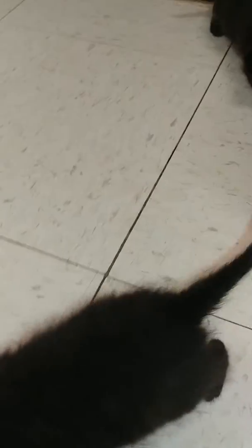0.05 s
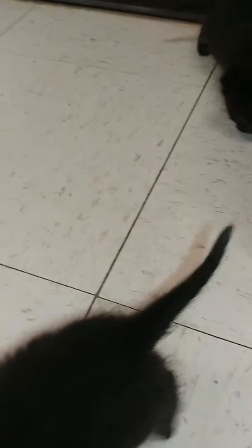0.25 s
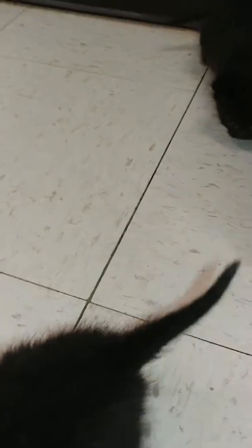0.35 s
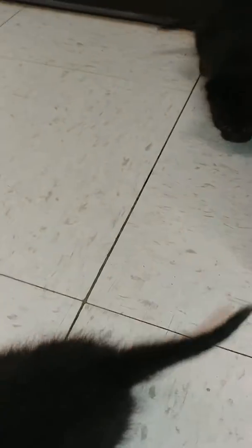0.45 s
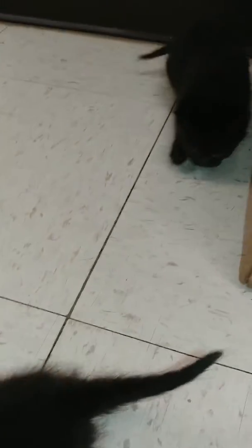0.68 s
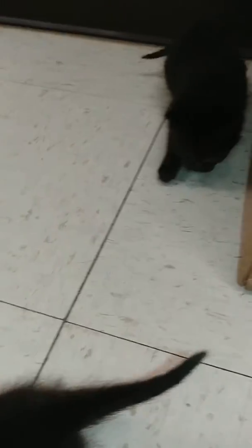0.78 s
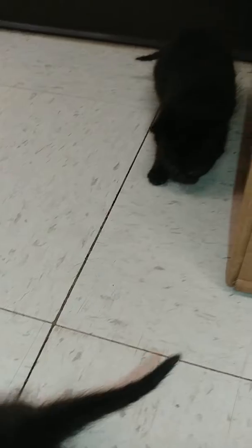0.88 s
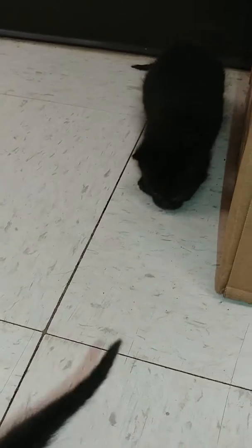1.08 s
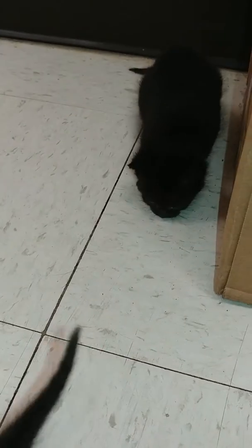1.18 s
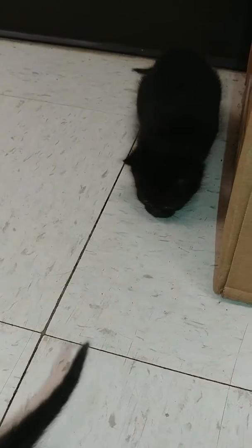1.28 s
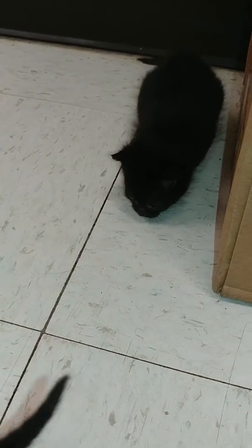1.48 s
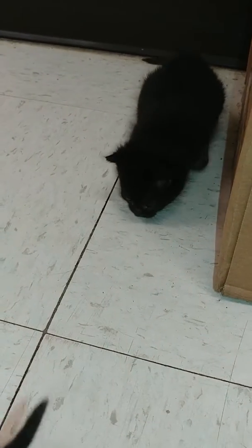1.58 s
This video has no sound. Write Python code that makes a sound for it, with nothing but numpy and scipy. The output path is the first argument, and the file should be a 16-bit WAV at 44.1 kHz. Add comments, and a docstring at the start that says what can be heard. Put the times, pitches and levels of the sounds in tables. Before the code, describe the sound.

Close to the microphone, lips make five crisp, wet kissing sounds in a fast, even run. Then come a small tick and a soft bump, over the faint steady hum of an appliance in a small, hard-floored room.

```python
"""Five quick, sharp lip smacks close to the microphone, probably kisses calling kittens in a small tiled room.
Each is a cluster of tiny wet snaps with the hollow pop of a small cavity opening.
The echo of a thin squeal dies away at the start; later come light ticks, a soft bump and tiny squeaks.
An appliance hums steadily underneath."""
import sys
import numpy as np
from scipy import signal
from scipy.fft import rfft, irfft, next_fast_len
from scipy.io import wavfile
from scipy.ndimage import map_coordinates

SR = 44100
rng = np.random.default_rng(int(sys.argv[2]) if len(sys.argv) > 2 else 0)


def output_pcm(signal):
    """Save a mono or channel-first signal as 16-bit PCM at the path in sys.argv[1].

    Samples are clipped to [-1, 1] before scaling.
    """
    pcm = np.clip(np.atleast_2d(signal).T, -1, 1) * 32767
    wavfile.write(sys.argv[1], SR, np.round(pcm).astype(np.int16))


N = 72765
SIDES = np.array([[.5], [-.5]])  # splits a left-minus-right value between the channels


def amp(db):
    return 10 ** (np.asarray(db) / 20)


def unit(x):
    """Scale to RMS 1."""
    return x / np.sqrt(np.mean(x ** 2) + 1e-20)


def along(points, hz):
    """Interpolate (Hz, value) points on a log axis."""
    freqs, values = np.transpose(points)
    return np.interp(np.log(hz + 1), np.log(freqs + 1), values)


def fade(t, t60):
    """Exponential decay, 60 dB in t60."""
    return np.exp(-np.log(1000) * t / t60)


def since(s):
    """Time since s, zero before it."""
    return np.maximum(np.arange(N) / SR - s, 0)


def wobble(rate):
    """Smooth random curve, rate knots a second."""
    return map_coordinates(rng.standard_normal(size=512), [np.arange(N) * rate / SR], mode="mirror")


def filtered(x, response):
    """Apply a complex frequency response."""
    size = next_fast_len(N + SR // 4)
    return irfft(rfft(x, size) * response(np.fft.rfftfreq(size, 1 / SR)), size)[..., :N]


def coloured(x, curve_db, size=2048):
    """Minimum-phase filter of unit energy."""
    cepstrum = irfft(np.log(amp(curve_db(np.fft.rfftfreq(size, 1 / SR))) + 1e-6))
    cepstrum[..., 1:size // 2] *= 2
    cepstrum[..., size // 2 + 1:] = 0
    impulse = np.atleast_2d(irfft(np.exp(rfft(cepstrum))))
    return signal.fftconvolve(np.atleast_2d(x), unit(impulse) / np.sqrt(size), axes=1)


def add(track, s, x):
    """Mix x into the track at time s."""
    start = round(s * SR)
    track[:, start:start + x.shape[-1]] += x[:, :N - start]


# Wet snaps (time [s], energy [dB], spray t60 [s], tilt [dB/octave], ring re snap [dB], ring [Hz])
SNAPS = [(0.2323, -25.5, 0.0049, 2, 1, 8600), (0.2364, -16.5, 0.0092, -3, -9, 5570),
         (0.2405, -12, 0.0013, 0.5, 0.5, 9000), (0.242, -9, 0.0085, 0.5, -3, 8980),
         (0.2435, -9.5, 0.0066, -0.5, -1, 5410), (0.3864, -20.5, 0.0064, -2.5, -14.5, 3240),
         (0.3906, -15.5, 0.0036, -3.5, -9.5, 8860), (0.3936, -11, 0.0011, -5.5, -18.5, 11500),
         (0.5232, -23.5, .003, 0, -17, 4500), (0.525, -5.5, 0.0074, 2, -7, 4490),
         (0.5261, -10.5, 0.012, 1.5, -6, 5600), (0.5254, -8.5, .003, 2.5, -9.5, 7440),
         (0.5285, -4.5, 0.016, -1.5, -14, 9070), (0.6486, -23, 0.0034, 0, -16.5, 6250),
         (0.6502, -21.5, 0.0067, -1, -15, 6307), (.6523, -5, 0.0068, -0.5, -2, 6370),
         (0.6527, -5, 0.0045, 0, 1.5, 5496), (0.6539, 0, 0.0015, 3, 2, 9196),
         (0.6568, -13, 0.0052, 0.5, -6.5, 9480), (0.7769, -29, 0.0055, -5.5, -9.5, 8570),
         (0.78, -14, 0.0046, -3, -17.5, 8270), (0.7833, -7, 0.0046, -2, -10.5, 5684),
         (.7860, -14, 0.012, 0, -1.5, 8980)]
# Snap spectrum (frequency [Hz], gain [dB])
SNAP_SPECTRUM = [(240, -20.5), (400, -5), (720, -12), (1100, -10.5), (1570, -8.5), (2000, -14.5),
                 (2600, -10.5), (3000, -4.5), (3600, -3.5), (4300, -6), (5000, -5.5), (5550, 0.5),
                 (6300, -3), (7100, -13), (8500, -7), (9200, -4.5), (9700, -12), (10400, -26.5),
                 (11400, -16), (12400, -13), (13300, -24), (14000, -19), (15300, -20), (16500, -34.5)]
# Smack balance (frequency [Hz], left minus right [dB])
SMACK_PAN = [(400, -4.5), (1200, -4), (1800, -11), (3000, -3), (4400, -7.5), (5500, -7), (6400, -0.5),
             (7700, 11), (9000, 13.5), (10500, 7.5), (12200, 1.5), (15000, -2.5)]
# Smack phase (frequency [Hz], left lead [rad])
SMACK_PHASE = [(200, 0), (1200, -.1), (3000, -0.2), (5000, .7), (6500, .7), (9000, 1), (12000, 0),
               (16000, 0)]
def smacks(spray_db=4.5, low_cut_hz=530, ring_rise_s=0.00023, ring_t60_s=0.012, size=2048):
    """Each lip snap is an impulse with a wet spray and a brief ring, probably microphone resonance."""
    out, t = np.zeros((2, N)), np.arange(size) / SR
    ring_envelope = fade(t, ring_t60_s) * (1 - np.exp(-t / ring_rise_s))
    for s, db, spray_t60, tilt, ring_db, ring_hz in SNAPS:
        def colour_db(hz):
            tilt_db = tilt * np.log2(np.maximum(hz, low_cut_hz))
            cut_db = 10 * np.log10(1 + (low_cut_hz / (hz + 1)) ** 4)
            return along(SNAP_SPECTRUM, hz) + SIDES * along(SMACK_PAN, hz) + tilt_db - cut_db

        burst = amp(spray_db) * unit(rng.standard_normal(size) * fade(t, spray_t60)) / np.sqrt(size)
        burst[0] -= 1  # the impulse
        snap = unit(coloured(burst, colour_db)[:, :size])
        ring_pan = amp(SIDES * along(SMACK_PAN, ring_hz))
        ring = unit(np.sin(2 * np.pi * ring_hz * t) * ring_envelope * ring_pan)
        add(out, s, amp(db) * (snap + amp(ring_db) * ring) / np.sqrt(size))
    return filtered(out, lambda hz: np.exp(1j * SIDES * along(SMACK_PHASE, hz)))


# Hollow pops (time [s], level [dB], frequency [Hz], t60 [s])
POPS = [(0.2436, -32.5, 802, .007), (0.3933, -24, 940, 0.0053), (0.5301, -27, 984, 0.027),
        (.6537, -22, 1270, .005), (0.7843, -37, 690, 0.0078)]
def pops(pan_db=-3.5):
    """A small cavity rings briefly as each smack opens."""
    out = np.zeros(N)
    for s, db, hz, t60 in POPS:
        t = since(s)
        out -= amp(db) * np.sin(2 * np.pi * hz * t) * fade(t, t60)
    return out * amp(SIDES * pan_db)


# Ticks and bumps (time [s], level [dB], frequency [Hz], t60 [s], attack [s], crack re ring [dB])
KNOCKS = [(0.7524, -58.5, 6000, 0.0068, 0.00024, -9), (0.8497, -35.5, 3420, 0.01, 0.000066, -14.5),
          (0.8497, -47, 8480, 0.013, .0001, -8.5), (0.8496, -41.5, 884, 0.029, 0.00039, -30),
          (1.127, -55, 1951, 0.013, .001, 6), (1.2785, -28.5, 56, 0.15, 0.014, -48),
          (1.3106, -35, 447, .025, 0.00071, -26), (1.3122, -42.5, 613, 0.025, 0.00092, -22.5)]
def knocks(pan_db=-2.5, crack_t60_s=0.0059, lowpass_hz=14200):
    """Faint contacts: a damped ring with a short crack of noise."""
    out = np.zeros(N)
    for s, db, hz, t60, attack_s, crack_db in KNOCKS:
        t = since(s)
        ring = np.sin(2 * np.pi * hz * t) * fade(t, t60)
        crack = amp(crack_db) * rng.standard_normal(N) * fade(t, crack_t60_s)
        out += amp(db) * (ring + crack) * (1 - np.exp(-t / attack_s))
    return filtered(out, lambda hz: 1 / (1 + 1j * hz / lowpass_hz) ** 2) * amp(SIDES * pan_db)


# Tiny squeaks (centre time [s], half length [s], frequency [Hz], glide [Hz/s], level [dB])
TINY_SQUEAKS = [(1.309, 0.031, 4300, -3.5, -76), (1.315, 0.0041, 8900, 0, -72.5),
                (1.362, .012, 7310, -12000, -73), (1.419, 0.017, 9000, 5000, -77)]
def tiny_squeaks():
    """Unsteady high tones swell and fade."""
    out = np.zeros(N)
    for s, half_length_s, hz, glide, db in TINY_SQUEAKS:
        t = np.arange(N) / SR - s
        phase = 2 * np.pi * (hz + glide * t / 2) * t + wobble(280)
        out += amp(db) * np.exp(-(t / half_length_s) ** 2) * np.sin(phase)
    return out


# Squeal partials (frequency [Hz], level [dB])
SQUEAL_PARTIALS = [(1545, -63.5), (3058, -69), (4620, -80)]
# Hiss spectrum (frequency [Hz], gain [dB])
SQUEAL_HISS = [(500, -34), (1200, 5.5), (3000, 0), (6000, 2.5), (9300, 4), (10500, -12), (14000, 0.5),
               (16000, -23)]
def squeal_echo(tone_t60_s=0.32, hiss_db=-60, hiss_t60_s=.5):
    """A thin, hissy squeal dies away in the room."""
    t = since(0)
    tones = np.zeros((2, N))
    for hz, db in SQUEAL_PARTIALS:
        drift_rad = np.array([wobble(35), wobble(35)])
        tones += amp(db) * unit(np.sin(2 * np.pi * hz * t + drift_rad))
    hiss = unit(filtered(rng.standard_normal((2, N)), lambda hz: amp(along(SQUEAL_HISS, hz))))
    return tones * fade(t, tone_t60_s) + amp(hiss_db) * hiss * fade(t, hiss_t60_s)


# Tail decay (frequency [Hz], t60 [s])
ROOM_T60 = [(300, 0.62), (1200, 0.3), (3000, 0.33), (6000, 0.29), (9000, 0.29), (15000, 0.43)]
# Reflection spectrum (frequency [Hz], gain [dB])
ROOM_COLOUR = [(200, -2.5), (600, 2), (1000, 1), (1600, -6), (2400, 4), (3200, -6), (4600, -1.5),
               (5550, -5), (6300, -0.5), (8000, 1), (9200, -9), (10500, -4.5), (12400, -8), (14000, -2.5),
               (16000, -2)]
def room(x, tail_db=-19, early_db=-12, wall_db=-19.5, wall_lag_s=.017, predelay_s=.004):
    """Near surfaces answer first, the nearest wall slaps back, and the hard room rings on."""
    band_hz, frame_s, noise = signal.stft(rng.standard_normal((2, SR // 2)), SR, nperseg=256)
    tail = signal.istft(noise * fade(frame_s, along(ROOM_T60, band_hz)[:, None]), SR, nperseg=256)[1]
    t = np.arange(tail.shape[1]) / SR
    early = rng.standard_normal(tail.shape) ** 3 * fade(t, t60=0.088)  # cubed for sparse reflections
    wall = rng.standard_normal(tail.shape) ** 3 * fade(abs(t - wall_lag_s), t60=0.018)
    parts = [(tail_db, tail), (early_db, early), (wall_db, wall)]
    impulse = sum(amp(db) * part / np.linalg.norm(part[0]) for db, part in parts)
    wet = signal.fftconvolve(x.mean(0)[None], impulse, axes=1)[:, :N]
    return filtered(wet, lambda hz: amp(along(ROOM_COLOUR, hz)) * np.exp(-2j * np.pi * hz * predelay_s))


# Mains and motor lines (frequency [Hz], level [dB])
HUM_LINES = [(59.3, -60), (119.5, -53), (178, -68.5), (240, -56.5), (298, -65), (318, -55), (359, -70.5),
             (474, -71), (526, -69.5)]
def hum(waver_db=2.25, drift_rad=.25):
    """Mains and motor tones waver slightly in level and phase."""
    out, t = np.zeros(N), since(0)
    for hz, db in HUM_LINES:
        gain = amp(db + waver_db * wobble(5.8))
        phase = 2 * np.pi * (hz * t + rng.random()) + drift_rad * wobble(6)
        out += gain * unit(np.sin(phase))
    return out


# Air spectrum (frequency [Hz], gain [dB])
AIR_SPECTRUM = [(20, -38), (32, -30), (45, -3.5), (60, 1.5), (80, -2.5), (100, -0.5), (160, -5),
                (220, -4.5), (320, -5.5), (390, -14), (480, -11.5), (650, -20), (950, -21.5), (1300, -30.5),
                (2500, -32.5), (4000, -40), (9000, -40.5), (11000, -47), (16000, -43.5)]
# Air width (frequency [Hz], left-right coherence [0..1])
AIR_COHERENCE = [(60, 0.96), (180, 0.99), (550, 0.45), (1650, 0), (15000, 0)]
def air(level_db=-50.5):
    """A low rush of air, centred in the bass and diffuse in the treble."""
    def mid_side_gains(hz):
        angle = np.arccos(np.clip(along(AIR_COHERENCE, hz), -1, 1)) / 2
        return amp(along(AIR_SPECTRUM, hz)) * [np.cos(angle), np.sin(angle)]

    mid, side = filtered(rng.standard_normal((2, N)), mid_side_gains)
    return amp(level_db) * unit(np.array([mid + side, mid - side]))


# Appliance balance (frequency [Hz], left minus right [dB])
APPLIANCE_PAN = [(60, 2), (120, -1.5), (300, -4), (950, -2.5), (3800, 0), (15000, 0)]
# Appliance envelope (time [s], gain [dB])
APPLIANCE_GAIN = [(0, 0), (.6, 0), (1.2, -1.5), (1.45, -1.5), (1.65, -3)]
def appliance():
    """Hum over rushing air, a little quieter toward the end."""
    drone = filtered(hum() + air(), lambda hz: amp(SIDES * along(APPLIANCE_PAN, hz)))
    return drone * amp(np.interp(since(0), *np.transpose(APPLIANCE_GAIN)))


def scene():
    """Close sounds and their reflections over the squeal's echo and the appliance."""
    near = smacks() + pops() + knocks() + tiny_squeaks()
    background = appliance()
    return near + room(near) + squeal_echo() + background


def record(dry):
    """Brick-wall low-pass at 16 kHz."""
    return filtered(dry, lambda hz: hz < 16000)


dry = scene()
out = record(dry)
output_pcm(out)
```